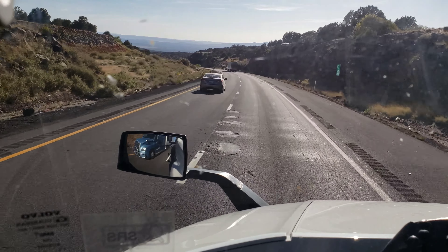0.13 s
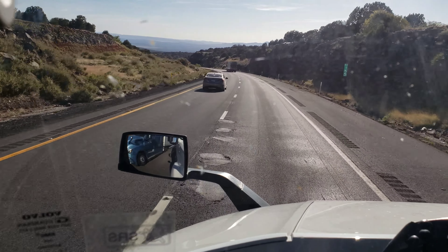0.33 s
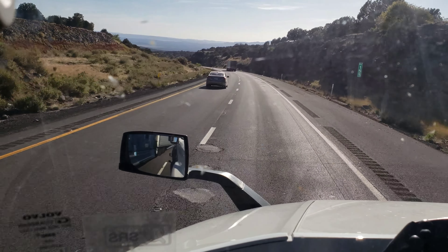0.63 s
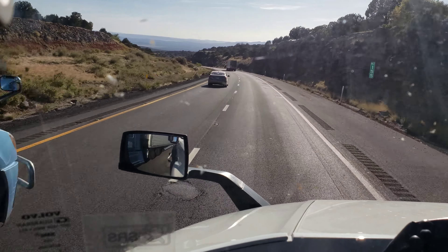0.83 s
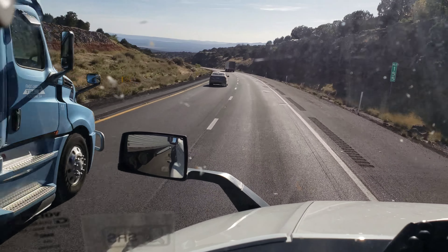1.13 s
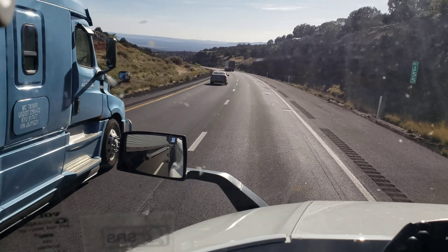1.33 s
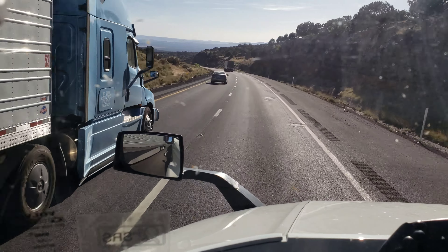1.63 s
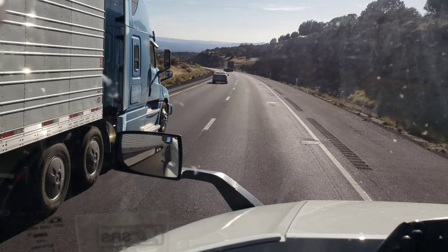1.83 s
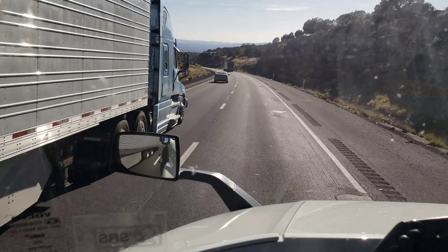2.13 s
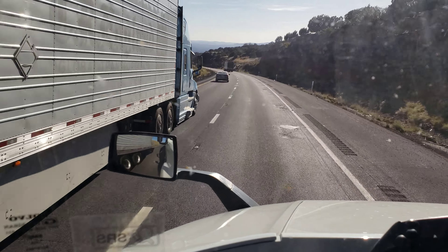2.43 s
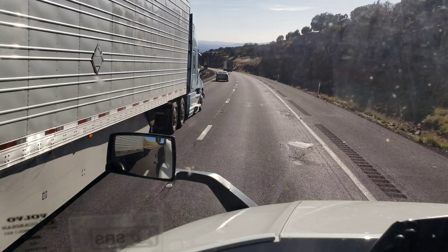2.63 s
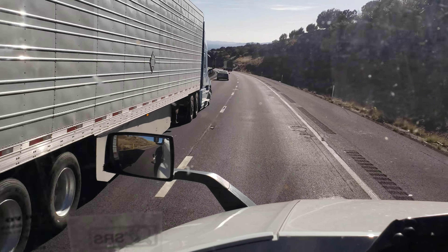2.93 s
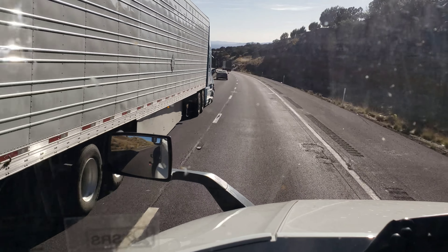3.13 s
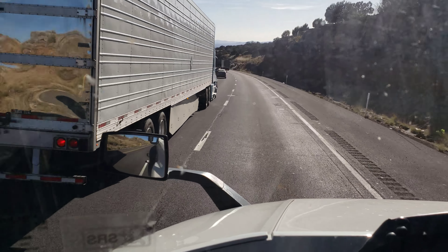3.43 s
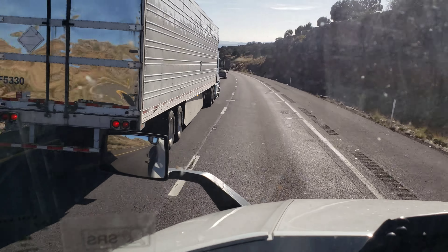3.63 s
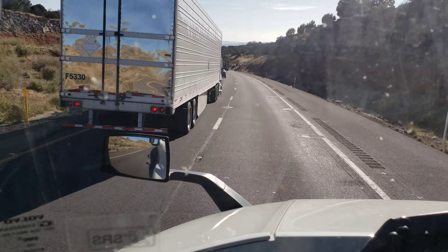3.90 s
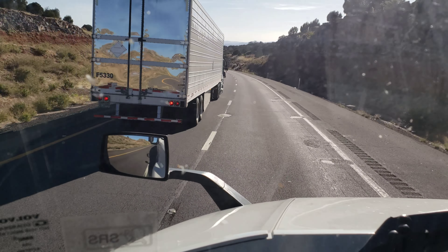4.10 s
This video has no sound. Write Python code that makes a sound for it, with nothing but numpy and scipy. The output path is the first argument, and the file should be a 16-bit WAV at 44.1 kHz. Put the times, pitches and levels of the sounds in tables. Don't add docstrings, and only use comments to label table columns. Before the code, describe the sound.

Low steady diesel drone and road roar heard in a cab, a turn-signal relay clicking regularly, small plastic squeaks, then a bumpy rattle.

```python
import sys
import numpy as np
from scipy import signal
from scipy.fft import rfft, irfft
from scipy.io import wavfile

SR = 44100
rng = np.random.default_rng(int(sys.argv[2]) if len(sys.argv) > 2 else 0)


def output_pcm(signal):
    pcm = np.clip(np.atleast_2d(signal).T, -1, 1) * 32767
    wavfile.write(sys.argv[1], SR, np.round(pcm).astype(np.int16))


def volts_from_db(level):
    exponent = np.asarray(level, float) / 20
    return 10 ** exponent


N = 188025
BOOM_HZ = 45.17

# (time [s], level [dB])
ROUGHNESS = [(0, 3), (.15, 1), (.8, 1), (1.1, 3.5), (1.3, 1), (3.1, 0), (3.42, 4), (3.77, 2), (3.85, 6.5),
             (4.02, 12), (4.264, 12)]


def amp_of_rms(db):
    return np.sqrt(2) * volts_from_db(db)


def rms_one(x):
    return x / np.sqrt(np.mean(x ** 2) + 1e-20)


def in_time(rows):
    s, level = np.transpose(rows)
    return np.interp(np.arange(N) / SR, s, level)


def at_hz(points, hz):
    points_hz, values = np.transpose(points)
    return np.interp(np.log(hz), np.log(points_hz), values)


def left_right(lean_db):
    return volts_from_db(np.array([[0.5], [-0.5]]) * lean_db)


def drift(rate):
    r = np.exp(-80 * np.pi * rate / SR)
    white = rng.standard_normal(N // 40 + 2002)
    slow = signal.lfilter([1], [1, -2 * r, r * r], white)[2000:]
    return np.interp(np.arange(N) / 40, np.arange(len(slow)), rms_one(slow))


def ring(push, hz, t60):
    r, w = volts_from_db(-60 / (t60 * SR)), 2 * np.pi * hz / SR
    return signal.lfilter([0, np.sin(w)], [1, -2 * r * np.cos(w), r * r], push + 1e-18)


def swells(events, rise_s, fall_s):
    s, db = np.transpose(events)
    since = np.arange(N) / SR - s[:, None]
    bells = np.exp(-(since / np.where(since < 0, rise_s, fall_s)) ** 2)
    return np.max(db[:, None] * bells, axis=0)


def tone(hz, level_db, wobble_db, wobble_rad, lean_db):
    phase = 2 * np.pi * np.cumsum(hz * np.ones(N)) / SR + wobble_rad * drift(6.6)
    height = amp_of_rms(level_db + wobble_db * drift(9.9))
    return height * np.sin(phase) * left_right(lean_db)


def coloured(spectrum, flicker_db, rate):
    # (frequency [Hz], correlation [-1..1])
    likeness = [(60, 0.98), (99, 0.98), (160, 0.98), (270, 0.92), (450, 0.37), (740, 0.18), (1210, -0.42),
                (2000, -0.1), (3310, -0.063), (5460, -0.043), (9010, 0.0099), (14900, -0.065)]
    # (frequency [Hz], level [dB])
    lean_curve = [(60, -0.5), (130, -0.5), (290, 1.5), (640, -1.5), (1400, -0.5), (3080, 0), (6770, -4.5),
                  (14900, -3.0)]
    hz = np.maximum(np.fft.rfftfreq(N, 1 / SR), 1)
    low_hz, high_hz = spectrum[0][0], spectrum[-1][0]
    inside = (hz >= low_hz) & (hz <= high_hz)
    alike = np.clip(at_hz(likeness, hz), -0.99, 0.995)
    lean = volts_from_db(np.outer([0.5, -0.5], at_hz(lean_curve, hz)))
    mid, side = rfft(rng.standard_normal((2, N))) * volts_from_db(at_hz(spectrum, hz)) * inside
    both = lean * (np.sqrt(1 + alike) * mid + np.sqrt(1 - alike) * side * [[1], [-1]])
    half_octave = np.log2(hz / low_hz) * 2
    shared = drift(rate)
    out = 0
    for k in range(int(half_octave[inside].max()) + 2):
        band = np.cos(np.pi / 2 * np.clip(half_octave - k, -1, 1)) ** 2
        flicker = volts_from_db(flicker_db * (0.6 * shared + drift(rate)))
        out = out + flicker * irfft(both * band, N)
    return out / np.std(out.mean(axis=0))


def overtones():
    # (multiple of the boom, level [dB])
    boom_orders = [(2, -32), (3, -36.5)]
    return sum(tone(k * BOOM_HZ, db, 2.6, 0.44, -1.7) for k, db in boom_orders)


def engine():
    # (time [s], level [dB])
    boom_level = [(0.0, -20), (0.13, -17.5), (0.26, -22), (0.41, -18.5), (0.59, -21.5), (0.84, -14.5),
                  (0.91, -26), (1.28, -19.5), (1.76, -19), (2.14, -22), (2.25, -20.5), (2.9, -17),
                  (3.01, -20), (3.4, -21), (3.76, -17), (3.85, -27), (3.95, -15), (4.26, -18.5)]
    # (time [s], level [dB])
    whine_loads = [
        (.45, 9.5),
        (.9, 7.5),
        (1.7, 13),
        (2.3, 7.5),
        (4.2, 11.5),
    ]
    t = np.arange(N) / SR
    boom = tone(BOOM_HZ, in_time(boom_level), 1.1, 0.53, -1.6) + overtones()
    half_db = np.maximum(-29 - 13 * np.maximum(t - 2.82, 0), -39)
    half = tone(2.51 * BOOM_HZ, half_db, 0.87, 0.31, -0.55)
    whine_hz = 282.5 - 1.4 * t
    whine_db = -49 + swells(whine_loads, rise_s=0.21, fall_s=0.35)
    return boom + half + tone(whine_hz, whine_db, 2.5, 0.36, 0.93)


def relay(events, modes, swell_s, tail_db, tail_t60, lag_cycles):
    t = np.arange(int(0.12 * SR)) / SR
    scatter = rng.standard_normal((2, len(t)))
    contact_band = signal.butter(5, [2800, 5300], "band", fs=SR, output="sos")
    snap = signal.sosfilt(contact_band, scatter[::-1])
    shape = volts_from_db(-28) * snap * t / 0.003 * np.exp(1 - t / 0.003)
    phases = rng.uniform(0, 2 * np.pi, len(modes))
    for (hz, left_db, right_db, t60), phase in zip(modes, phases):
        padded = min(1, hz / 2000)
        late = np.maximum(t - lag_cycles / hz, 0) / (swell_s * np.sqrt(padded))
        decay = volts_from_db(-60 / (t60 * padded * SR))
        swell = signal.lfilter([1], [1, -decay], late ** 3 * np.exp(-3 * late))
        path = np.array([[0], [np.pi / 2]])
        direct = swell * np.sin(2 * np.pi * hz * t + phase + path)
        tail = volts_from_db(-60 * t / tail_t60) * (1 - np.exp(-late)) ** 2 * scatter
        tail = ring(ring(tail, hz, t60 / 3), hz, t60 / 3)
        both = rms_one(direct) + volts_from_db(tail_db) * padded ** 2 * rms_one(tail)
        side_gain = volts_from_db(np.array([[left_db], [right_db]]) + 0.5)
        shape = shape + side_gain * both / both.std(axis=1, keepdims=True)
    strokes = np.zeros((1, N))
    for s, db in events:
        strokes[0, round(s * SR)] = volts_from_db(db)
    return signal.fftconvolve(strokes, shape, axes=1)[:, :N]


def flasher():
    # (time [s], level [dB])
    pull_ins = [
        (.1312, -4.5),
        (.7311, -4),
        (1.411, -3.5),
        (2.0508, -4),
        (2.6507, -4),
        (3.331, -4),
        (3.9706, -6),
    ]
    # (time [s], level [dB])
    drop_outs = [
        (.4529, -1.5),
        (1.0932, -1.5),
        (1.693, -1.5),
        (2.3726, -1),
        (3.0126, -1.5),
        (3.6125, -2),
    ]
    # (frequency [Hz], left [dB], right [dB], t60 [s])
    pull_in_modes = [(645, -43, -41, 0.021), (761, -43, -31, 0.025), (887, -40, -35, 0.028),
                     (1080, -37.5, -40.5, 0.053), (1580, -56, -55, 0.035), (2028, -65, -41, 0.018),
                     (2100, -44, -37, 0.023), (2172, -45, -61, 0.04), (2460, -42, -37.5, 0.017),
                     (2620, -37.5, -38, 0.019), (2930, -55, -47, 0.031), (3255, -47, -51, 0.03),
                     (3480, -51, -43.5, 0.03), (3780, -51, -52, 0.03), (4300, -64, -51, 0.018),
                     (4660, -57, -63, 0.047), (5040, -60, -54, 0.03), (5580, -59, -49, 0.033),
                     (7300, -85, -61, 0.0082), (8600, -78, -83, 0.012), (10120, -70, -59, 0.013),
                     (11700, -82, -67, 0.012)]
    drop_out_modes = [(1100, -47.5, -46.5, 0.038), (1730, -65, -49.5, 0.018), (1924, -57, -44, 0.025),
                      (2063, -48, -40, 0.021), (2290, -67, -53, 0.033), (2684, -33.5, -31.5, 0.013),
                      (2940, -44.5, -42, 0.028), (3080, -52, -46, 0.022), (3480, -49, -40.5, 0.021),
                      (3720, -47.5, -56, 0.041), (4380, -61, -51, 0.025), (4670, -64, -56, 0.037),
                      (4984, -54, -49, 0.033), (5260, -56, -49, 0.048), (5470, -68, -65, 0.032),
                      (5800, -84, -70, 0.022), (7000, -85, -83, 0.012), (10100, -70, -61.5, 0.011),
                      (10900, -79, -68, 0.012), (11800, -78, -63, 0.012)]
    tocks = relay(pull_ins, pull_in_modes, swell_s=0.004, tail_db=-9, tail_t60=0.1, lag_cycles=2.2)
    ticks = relay(drop_outs, drop_out_modes, swell_s=0.0031, tail_db=-9, tail_t60=0.11, lag_cycles=0.6)
    return tocks + ticks


def knocks():
    # (time [s], peak [dB], body [Hz], treble [dB], left minus right [dB])
    knock_events = [(.011, -46, 4000, -51, -2), (.972, -46, 7016, -50, -3), (1.015, -56, 7000, -57, -1),
                    (1.055, -53, 7000, -59, 0), (1.145, -50, 6970, -53, 0), (1.193, -47, 6990, -54, 0),
                    (3.298, -34, 3860, -53, -5), (3.373, -36.5, 4700, -56, -6), (3.81, -44, 6990, -45, -2),
                    (3.917, -38, 3200, -60, -4), (3.934, -31, 6340, -39, 0), (3.977, -30.5, 5100, -39, -4),
                    (4.008, -34, 7080, -54, -4), (4.03, -26.5, 4030, -52, -2), (4.055, -34, 7100, -39, -5),
                    (4.093, -34.5, 3950, -52, -4), (4.136, -40, 3880, -52, -1), (4.213, -42, 7100, -49, -3),
                    (4.25, -32, 7000, -48, -5)]
    # (frequency [Hz], t60 [s])
    plastic_modes = [(10200, .005), (11600, 0.004), (13000, 0.0064), (14900, .003)]
    t = np.arange(int(0.06 * SR)) / SR
    fall = (1 - np.exp(-t / 0.00061)) * volts_from_db(-60 * t / 0.096)
    out = np.zeros((2, N + len(t)))
    for s, body_db, hz, treble_db, pan_db in knock_events:
        body_scuff, treble_scuff = rng.standard_normal((2, 2, len(t)))
        body = rms_one(ring(body_scuff, hz, 0.0063)) + 1.24 * rms_one(ring(body_scuff, 2560, 0.0016))
        treble = rms_one(sum(ring(treble_scuff, mode_hz, t60) for mode_hz, t60 in plastic_modes))
        burst = (volts_from_db(body_db - 5.5) * body + volts_from_db(treble_db + 1.5) * treble) * fall
        start = round(s * SR)
        out[:, start:start + len(t)] += burst * left_right(pan_db)
    return out[:, :N]


def squeaks():
    # (time [s], peak [dB], frequency [Hz], length [s])
    rubs = [
        (1.337, -45, 4070, 0.0075),
        (1.365, -41, 4120, 0.013),
        (1.46, -52, 4200, .015),
        (1.5, -43, 2650, 0.02),
        (1.543, -46, 3960, 0.011),
        (1.565, -54, 4300, 0.0085),
        (1.576, -40, 4080, 0.014),
    ]
    t, out = np.arange(N) / SR, np.zeros((2, N))
    for s, db, hz, length_s in rubs:
        near = slice(round((s - 0.05) * SR), round((s + 0.05) * SR))
        rough = rms_one(ring(rng.standard_normal((2, near.stop - near.start)), hz, 0.016))
        out[:, near] += volts_from_db(db) * np.exp(-((t[near] - s) / length_s) ** 2) * rough
    return out


def trim_buzz(rough_db):
    # (frequency [Hz], density [dB per Hz])
    buzz_spectrum = [(4470, 4.5), (7600, 0.5), (8420, -7), (10100, -7.5), (14100, -1.5), (15300, -2.5)]
    shake = np.cos(np.pi * BOOM_HZ * np.arange(N) / SR + 0.8)
    return volts_from_db(-57.5 + rough_db + 0.7 * shake) * coloured(buzz_spectrum, 1.6, 45)


def road(rough_db):
    # (frequency [Hz], density [dB per Hz])
    thump_spectrum = [(29, -24), (50, 0), (70, 4.5), (102, -3.5), (150, -9), (200, -26), (330, -120)]
    roar_spectrum = [(76, -30), (130, -4.5), (150, -7), (189, 1.5), (243, -8), (285, -9), (307, -12),
                     (407, -13), (438, -13.5), (538, -13), (618, -18), (827, -21.5), (1120, -25),
                     (1220, -19), (1700, -37.5), (2210, -58), (3740, -120)]
    # (time [s], level [dB])
    joints = [(.37, 3.5), (.72, 5.5), (.95, 6), (1.51, 8), (1.65, 7), (1.93, 3), (2.2, 5.5), (2.33, 1.5),
              (2.66, 8.5), (2.91, 10), (3.21, 5), (3.42, 10.5), (3.88, 6.5), (4.15, 6.5)]
    thump_db = -28.5 + 0.42 * rough_db + swells(joints, rise_s=0.04, fall_s=0.094)
    roar_db = -27 + 0.083 * rough_db
    thump = volts_from_db(thump_db) * coloured(thump_spectrum, 1.0, 19)
    return thump + volts_from_db(roar_db) * coloured(roar_spectrum, 0.69, 6.7)


def wind(rough_db):
    # (frequency [Hz], density [dB per Hz])
    wind_spectrum = [(760, 3), (1300, -10), (1650, -8), (1810, -6), (2040, -11.5), (2370, -8), (2570, -11),
                     (2800, -9.5), (3440, -12), (3930, -12), (4500, -17), (5440, -34.5), (7170, -19),
                     (8600, -52), (11200, -37), (18900, -120)]
    return volts_from_db(-46.5 + 0.39 * rough_db) * coloured(wind_spectrum, 1.0, 16)


def scene():
    rough_db = in_time(ROUGHNESS)
    trim = knocks() + squeaks() + trim_buzz(rough_db)
    return engine() + flasher() + trim + road(rough_db) + wind(rough_db)


def band_limit(x):
    return signal.sosfilt(signal.butter(12, 15480, fs=SR, output="sos"), x)


def record(dry):
    bass_cut = signal.butter(3, 35, "high", fs=SR, output="sos")
    mix = signal.sosfilt(bass_cut, dry)
    return band_limit(mix)


dry = scene()
out = record(dry)
output_pcm(out)
```